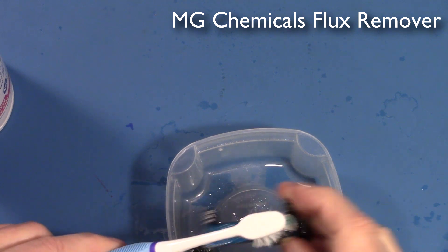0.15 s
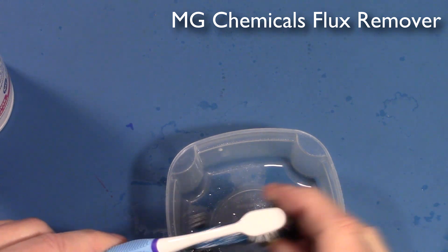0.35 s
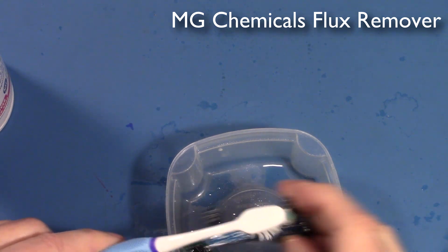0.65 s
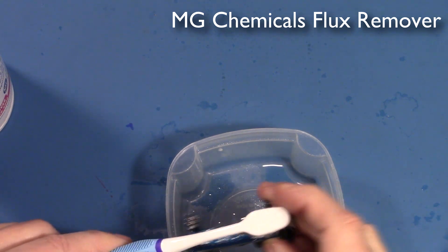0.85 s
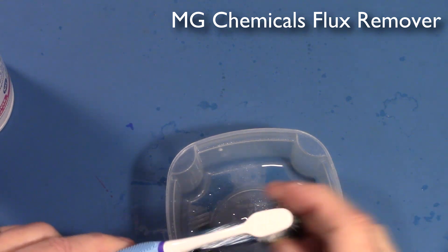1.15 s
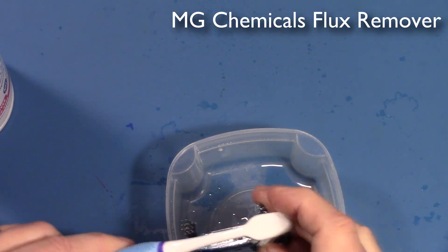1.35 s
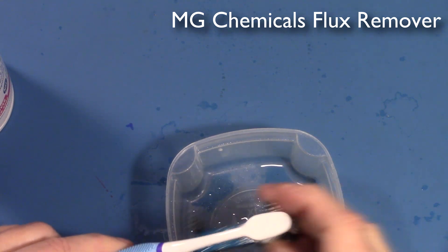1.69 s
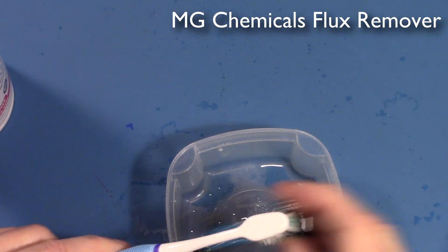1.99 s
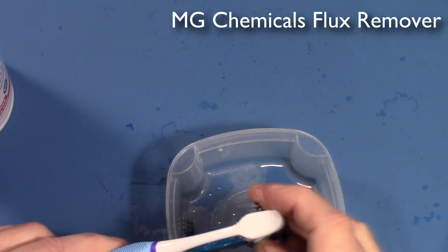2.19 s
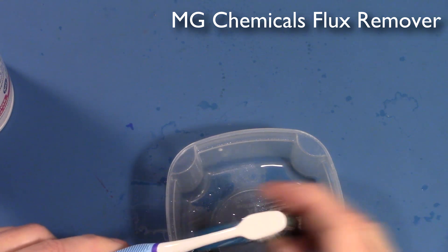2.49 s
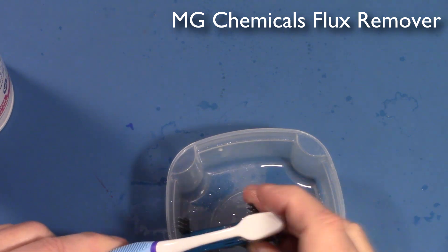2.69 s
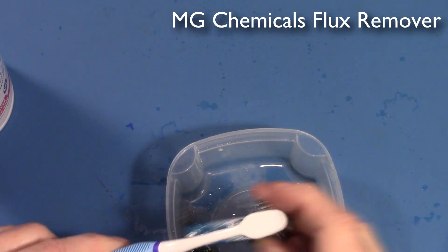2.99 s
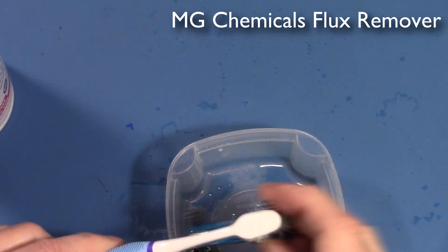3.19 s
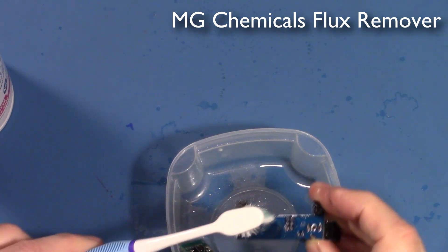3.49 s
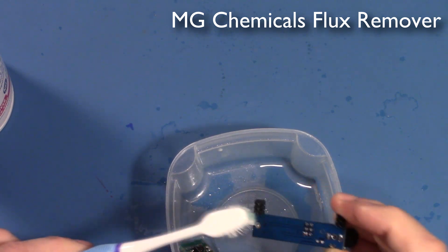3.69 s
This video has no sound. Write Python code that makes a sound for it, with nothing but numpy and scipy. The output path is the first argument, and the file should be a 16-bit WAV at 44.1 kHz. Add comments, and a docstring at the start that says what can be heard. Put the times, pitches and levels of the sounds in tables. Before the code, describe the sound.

A toothbrush scrubs a wet circuit board over a plastic tub, crisp strokes growing stronger before stopping near the end; close microphone, small dry room, strong low electrical hum and faint hiss.

```python
"""Over a plastic tub, in a space with a short echo, a toothbrush scrubs to and fro on a small wet board.
The board is an electronic one: bristles flick across its pins and parts and make it ring.
Flicks and scrubbing are shaped noise, single snaps and ticks are fading tones, and two knocks hit the tub.
Strong mains hum made of steady tones, soft low throbs and a little noise hiss lie under it all."""
import sys
import numpy as np
from scipy import signal
from scipy.io import wavfile
from scipy.ndimage import uniform_filter1d

SR = 44100
rng = np.random.default_rng(int(sys.argv[2]) if len(sys.argv) > 2 else 0)


def generate_wav(signal):
    """Clip the signal to [-1, 1] and save it as 16-bit WAV at the path in sys.argv[1]."""
    frames = np.transpose(np.atleast_2d(signal))
    scaled = np.clip(frames, -1, 1) * 32767
    pcm = np.round(scaled).astype(np.int16)
    wavfile.write(sys.argv[1], SR, pcm)


N = 169785  # length in samples

# Shape of the hiss. Each row: pitch in Hz, relative level in dB per Hz.
HISS_SHAPE = [(8, -8.5), (22, 1.5), (40, -15), (70, -13.5), (130, -18.5), (300, -21), (700, -28.5),
              (1500, -31.5), (3500, -32.5), (8000, -40.5), (12000, -45), (15800, -48)]
# Steady tones of the hum. Each row: multiple of the mains pitch, peak level in dB.
HUM_TONES = [(1, -39), (2, -72), (3, -53), (5, -66.5), (6, -92), (7, -71.5), (9, -73), (11, -85.5),
             (13, -80.5), (19, -93.5), (23, -81.5), (25, -79.5), (27, -84.5), (29, -85), (31, -85.5),
             (37, -97), (43, -84.5)]
# Low throbs. Each row: time in seconds, peak level in dB.
THROBS = [(.196, -47), (.911, -51), (1.614, -47), (2.337, -45), (3.059, -44), (3.782, -48)]
# Faint ticks of the lifted brush. Each row: start in seconds, level in dB before roughening.
TICKS = [(3.6611, -71), (3.6744, -71), (3.688, -64), (3.7279, -65.5), (3.7698, -70), (3.7973, -72)]
# Knocks on the tub. Each row: time in seconds, blow level in dB, blow pitch in Hz, ring pitch in Hz,
# ring level in dB against the blow, seconds for the ring to fall 60 dB, bounce delay in seconds,
# bounce level in dB against the first blow.
KNOCKS = [(1.8675, -44, 755, 650, -6, 0.025, 0.0065, -19),
          (1.94295, -28.5, 2010, 2350, -16.5, 0.02, .005, -14)]
# Snaps of single bristles. Each row: time in seconds, peak level in dB, pitch in Hz.
SNAPS = [(0.0398, -51, 9300), (0.0806, -57, 8600), (0.1219, -40, 9250), (0.1362, -39, 9600),
         (0.2548, -36.5, 9100.0), (0.2779, -45, 8800.0), (0.3161, -42.5, 8700.0), (0.3517, -41.0, 8900),
         (0.4495, -55, 10400.0), (0.472, -44, 9400.0), (0.59, -43.0, 8850), (0.6241, -37, 10000),
         (0.6956, -46, 9800), (0.765, -40.0, 9900.0), (0.7932, -38, 9350), (0.8259, -36.5, 9400),
         (0.8383, -48.0, 9400.0), (0.8487, -47.0, 9400.0), (0.8805, -39, 9800), (0.9057, -36, 9600),
         (0.939, -44, 9300.0), (0.9544, -42, 10200), (0.978, -49, 10000.0), (0.9966, -43, 9400),
         (1.0257, -44, 10100), (1.049, -40, 9500), (1.164, -47, 9600), (1.2133, -57, 10300),
         (1.2353, -40, 10000), (1.2407, -39, 8750), (1.2952, -40.0, 8900.0), (1.3118, -39.0, 8700.0),
         (1.3188, -39.0, 8900.0), (1.332, -43, 9400.0), (1.3754, -46, 9600), (1.4103, -32.5, 9600),
         (1.4316, -45, 9200.0), (1.504, -48, 9000.0), (1.5537, -37, 9200), (1.586, -31, 9100),
         (1.6359, -48.0, 9500.0), (1.6488, -39, 9500.0), (1.6914, -35.0, 10300), (1.7487, -33.5, 9300),
         (1.7916, -44, 9100), (1.8001, -41, 9400), (1.889, -36.5, 9800), (1.93, -37.5, 9000),
         (1.9658, -32.0, 10200), (2.0659, -37.5, 9100), (2.1035, -34, 8950), (2.1849, -39, 9400),
         (2.191, -36, 10200.0), (2.2251, -30, 9000), (2.232, -28, 9100), (2.2633, -34, 6900),
         (2.3253, -44, 11600.0), (2.3999, -27.5, 8970), (2.435, -37, 9400), (2.4757, -30.0, 9200),
         (2.5146, -41, 8800), (2.6531, -38, 9400), (2.6961, -44.0, 9300.0), (2.7029, -46, 9400.0),
         (2.7463, -49, 9200), (2.7636, -34, 9000), (2.849, -42.0, 9800), (2.967, -43.0, 8900.0),
         (3.0809, -38.5, 6900.0), (3.096, -28, 8900), (3.133, -32, 8950), (3.1389, -35, 8800.0),
         (3.1495, -33, 9000), (3.2219, -48, 10100.0), (3.2438, -37, 9000), (3.3325, -50, 9300),
         (3.3427, -39, 8900), (3.3946, -53, 9200.0), (3.4035, -56, 7800.0), (3.4093, -56.0, 9200.0),
         (3.4195, -48, 9400.0), (3.7387, -60.0, 9200.0), (3.7586, -58, 10300)]
# Brush strokes. Each row: start of full speed in seconds, seconds held, bristle level in dB,
# rise in seconds per 20 dB, fall in seconds per 20 dB, then levels in dB against the bristles for
# the high, middle and low board ringing, the deep bristle ring and the fine fizz.
STROKES = [(0.0, 0.0041, -57, 0.299, 0.045, -15.0, -27, -31, -7.5, -17.0),
           (0.082, 0.042, -57.5, 0.016, 0.039, -2.5, -15.5, -20, -6.5, -15),
           (0.238, 0.028, -52.5, 0.08, 0.027, -13.5, -22, -24, -9, -14),
           (0.345, 0.014, -50.5, 0.042, 0.043, -9.5, -15.5, -20, -9, -18),
           (0.482, 0.044, -55, 0.11, 0.024, -13, -19.0, -17, -8.5, -15),
           (0.604, 0.025, -51, 0.044, 0.032, -11, -16.0, -15, -8, -14),
           (0.736, 0.054, -53.4, 0.083, 0.012, -12.5, -21, -16, -6.5, -14),
           (0.891, 0.021, -49.5, 0.08, 0.018, -13.0, -15.0, -17, -6, -17),
           (1.049, 0.002, -55.5, 0.21, 0.023, -13.5, -22, -15, -6, -17.0),
           (1.149, 0.017, -45, 0.049, 0.02, -12, -19.5, -18.5, -7.5, -16),
           (1.317, 0.0045, -51.5, 0.2, 0.018, -13, -21, -19, -7.5, -15),
           (1.413, 0.026, -48.5, 0.067, 0.025, -10, -15, -18.5, -9, -15),
           (1.562, 0.034, -51, 0.1, 0.029, -13, -20, -21, -8.5, -16),
           (1.696, 0.013, -45.5, 0.06, 0.03, -12, -16.0, -20, -7.5, -14),
           (1.841, 0.031, -48.5, 0.12, 0.038, -15, -20, -20.5, -9, -14),
           (1.964, 0.032, -47, 0.06, 0.02, -11.5, -13.5, -22.5, -8.5, -14),
           (2.099, 0.038, -48.5, 0.1, 0.017, -14.5, -21.5, -19.5, -8.5, -16.0),
           (2.224, 0.042, -47, 0.067, 0.02, -12.5, -17.5, -21, -7.5, -13),
           (2.363, 0.029, -49.5, 0.11, 0.012, -14.5, -20, -20, -8.5, -15),
           (2.474, 0.026, -45.5, 0.06, 0.036, -12.5, -16.5, -19.5, -8, -15.0),
           (2.607, 0.04, -51, 0.089, 0.021, -12.0, -17.5, -18, -8, -16),
           (2.731, 0.021, -44.0, 0.047, 0.036, -11.5, -14.5, -16.5, -6.5, -13),
           (2.875, 0.032, -49, 0.088, 0.031, -13.5, -16.5, -19, -7.5, -13),
           (2.994, 0.023, -45.8, 0.049, 0.028, -13.5, -17, -20.5, -4.5, -16),
           (3.103, 0.069, -49.5, 0.064, 0.023, -13, -23.5, -25, -9.5, -16.0),
           (3.264, 0.065, -52, 0.057, 0.037, -12.5, -18, -20, -5.0, -12),
           (3.484, 0.002, -46.5, 0.072, 0.084, -13.5, -19.5, -16, -9, -15),
           (3.666, 0.013, -67.0, 0.046, 0.17, -12, -24, -17, -5.5, -19)]
# Tone colour of the bristle flicks. Each row: pitch in Hz, relative level in dB.
BRISTLE_COLOUR = [(3000, -59), (5300, -25), (6840, -33.5), (7500, -10.5), (8130, -5), (9260, -1.5),
                  (10500, -9), (12000, -11), (13500, -24), (15800, -55.5)]
# Ring of longer bristles. Each row: pitch in Hz, width in Hz, relative level in dB.
DEEP_BRISTLE_RING = [(6360, 820, 1.5), (6900, 310, 0.5), (7480, 200, -9)]
# Tone colour of the fine fizz. Each row: pitch in Hz, relative level in dB.
FIZZ_COLOUR = [(8000, -27), (11000, -3), (12500, 4.5), (14000, -3.5), (15800, -20)]
# Low ringing of the board. Each row: pitch in Hz, width in Hz, relative level in dB.
BOARD_LOW = [(704, 80, -5.5), (923, 83, 0), (1217, 150, -0.5), (1580, 200, -4)]
# Middle ringing of the board. Each row: pitch in Hz, width in Hz, relative level in dB.
BOARD_MID = [(2130, 620, -4.5), (2350, 380, 5.5), (3010, 330, 3)]
# High ringing of the board. Each row: pitch in Hz, width in Hz, relative level in dB.
BOARD_HIGH = [(3785, 1100, 2.5), (4440, 460, 3.5), (4980, 220, -5), (5520, 230, -7.5)]

HISS_DB, HISS_PATCH_DB = -62.5, 2  # overall level, strength of the random patches
MAINS_HZ, HUM_LEAD_RAD, HUM_DELAY_S = 60, -0.31, 0.00458
THROB_HZ, THROB_SPREAD_S = 51, 0.0064
TICK_HZ, TICK_T60_S, TICK_ROUGH = 4980, 0.071, 0.86  # T60: time to fall 60 dB
BLOW_CYCLES = 0.35  # spread of the bell-shaped blow, in cycles of its own pitch
SNAP_T60_S, SNAP_RISE_S, SNAP_EDGE_DB = 0.0019, 0.0004, -19
SNAP_ECHO_S, SNAP_ECHO_DB = 0.0012, -14.5  # off the tub wall
FLICKS_PER_S, FLICK_SPREAD_DB = 6000, 5  # average rate, unevenness in size
GROUPS, FLICK_PATCH_DB = 12, 3  # bristle groups and how much their colours differ
TUFT_S = 0.012  # another tuft of bristles leads after this long
CLUMP_DB, CLUMP_S, SWISH_DB = 1, 0.0037, -4
BOARD_RUB_DB = -1.2  # smooth rubbing beside the flicks
BOARD_LAG_S = 0.002  # the board answers late
HIGH_STEEP, MID_STEEP, LOW_STEEP = 1, 1.4, 1.9  # larger: sounds mostly at full speed
ROOM_DB, ROOM_T60_S = -14.5, 0.046
EDGE_HZ = 15900


def amp(db):
    """Turns decibels into a plain multiplier."""
    return 10 ** (np.asarray(db) / 20)


def evened(x):
    """Scales x to an average (RMS) strength of one."""
    return x / np.sqrt(np.mean(x ** 2) + 1e-30)


def read(points, hz):
    """Reads a level curve between its points, along a logarithmic pitch scale."""
    f, value = np.transpose(points)
    return np.interp(np.log(hz + 1), np.log(f + 1), value)


def add(mix, s, sound):
    """Adds a sound into the mix, starting at s seconds."""
    part = mix[round(s * SR):][:len(sound)]
    part += sound[:len(part)]


def colour(x, db):
    """Filters x to a dB curve on 257 bins, with no sound before its cause (minimum phase)."""
    log_gain = np.log(amp(np.r_[db, db[-2:0:-1]]))
    taps = np.fft.ifft(np.exp(np.conj(signal.hilbert(log_gain)))).real
    return signal.oaconvolve(x, taps[:256])[:N]


def ring(x, modes):
    """Sends x through fixed resonances; a wider one dies away faster."""
    out = np.zeros(N)
    for hz, width, db in modes:
        r = np.exp(-np.pi * width / SR)
        feedback = [1, -2 * r * np.cos(2 * np.pi * hz / SR), r * r]
        out += amp(db) * evened(signal.lfilter([1, 0, -1], feedback, x))
    return evened(out)


def ping(hz, t60):
    """A tone that falls 60 dB in t60 seconds."""
    t = np.arange(0, t60, 1 / SR)
    return amp(-60 * t / t60) * np.sin(2 * np.pi * hz * t)


def hiss():
    """Room and circuit hiss: random short-time spectra with faint drifting patches."""
    frames, hz = N // 1024 + 5, np.fft.rfftfreq(4096, 1 / SR)
    a, b, patches = rng.standard_normal((frames, 2049, 3)).T
    patches = uniform_filter1d(patches, 40, axis=0)  # smooth across pitch
    patches = evened(uniform_filter1d(patches, 3, axis=1))  # smooth across time
    spectra = (a + 1j * b) * amp(read(HISS_SHAPE, hz)[:, None] + HISS_PATCH_DB * patches)
    sound = signal.istft(spectra, nperseg=4096, noverlap=3072)[1][:N]
    return amp(HISS_DB) * evened(sound)


def hum():
    """Mains hum: the mains pitch with mostly odd multiples, as steady tones."""
    t = np.arange(N) / SR - HUM_DELAY_S
    return sum(amp(db) * np.cos(2 * np.pi * k * MAINS_HZ * t + HUM_LEAD_RAD) for k, db in HUM_TONES)


def throbs():
    """Soft low throbs: about one cycle of a deep tone under a bell-shaped swell."""
    t, out = np.arange(N) / SR, np.zeros(N)
    for s, db in THROBS:
        swell = np.exp(-0.5 * ((t - s - THROB_SPREAD_S / 2) / THROB_SPREAD_S) ** 2)
        out += amp(db) * swell * np.cos(2 * np.pi * THROB_HZ * (t - s))
    return out


def lifted_brush_ticks():
    """Thin fading tones, each roughened by random wobbles in level."""
    out, tick = np.zeros(N), ping(TICK_HZ, TICK_T60_S)
    for s, db in TICKS:
        wobble = evened(uniform_filter1d(rng.standard_normal(8000), 60))[:len(tick)]
        add(out, s, amp(db) * tick * (1 + TICK_ROUGH * wobble))
    return out


def tub_knocks():
    """A short blow sets the tub ringing, then a weaker bounce repeats it."""
    out, t = np.zeros(N), np.arange(-100, 2000) / SR  # the blow is centred on t = 0
    for s, db, hz, ring_hz, ring_db, t60, after, bounce_db in KNOCKS:
        blow = np.exp(-0.5 * (t * hz / BLOW_CYCLES) ** 2) * np.cos(2 * np.pi * hz * t)
        tail = (t > 0) * amp(ring_db - 60 * abs(t) / t60) * np.cos(2 * np.pi * ring_hz * t)
        knock = blow + tail
        add(out, s + t[0], amp(db) * knock)
        add(out, s + t[0] + after, amp(db + bounce_db) * knock)
    return out


def bristle_snaps():
    """A bristle springs free: a tiny fading tone, a sharp click and an echo off the tub wall."""
    out = np.zeros(N)
    for s, db, hz in SNAPS:
        snap = ping(hz, SNAP_T60_S)
        snap = snap * np.minimum(np.arange(len(snap)) / SR / SNAP_RISE_S, 1)
        snap = snap / abs(snap).max()
        add(out, s - SNAP_RISE_S, amp(db) * snap)
        add(out, s, amp(db + SNAP_EDGE_DB) * np.array([1., -2, 1]))
        add(out, s + SNAP_ECHO_S, amp(db + SNAP_ECHO_DB) * snap)
    return out


def stroke_level(lag_s, steep, column=None):
    """Rise, hold and fall of every stroke, added in power; column picks a relative level."""
    t, power = np.arange(0, N, 32) / SR - lag_s, 0
    for row in STROKES:
        s, hold, db, rise, fall = row[:5]
        relative_db = row[column] if column else 0
        down = np.maximum(s - t, 0) / rise + np.maximum(t - s - hold, 0) / fall
        power = power + amp(2 * (db + relative_db - 20 * steep * down))
    return np.interp(np.arange(N), np.arange(0, N, 32), np.sqrt(power))


def flicks_and_swish():
    """Clumps of random flicks of unequal size, over the smooth noise of a wet swish."""
    clumps = uniform_filter1d(rng.standard_normal(N), max(round(CLUMP_S * SR), 1))
    clumps = amp(CLUMP_DB * evened(clumps))
    size = amp(FLICK_SPREAD_DB * np.minimum(rng.exponential(1, N), 4))
    size = size * rng.choice([-1., 1.], N)
    flicks = evened(size * (rng.random(N) < FLICKS_PER_S / SR))
    return evened(clumps * (flicks + amp(SWISH_DB) * rng.standard_normal(N)))


def bristles(drive):
    """Bristle tips, each group with its own colour, with a deeper ring and a fine fizz."""
    hz = np.fft.rfftfreq(512, 1 / SR)
    tuft = rng.integers(0, GROUPS, N)[np.arange(N) // round(TUFT_S * SR)]
    group = (tuft + rng.integers(0, 5, N)) % GROUPS  # neighbouring groups join in
    own = uniform_filter1d(rng.standard_normal((GROUPS, 257)), 14, axis=1)
    own = FLICK_PATCH_DB * evened(own - own.mean(0))
    shape = read(BRISTLE_COLOUR, hz)
    tips = evened(sum(colour(drive * (group == k), shape + own[k]) for k in range(GROUPS)))
    deep = ring(drive, DEEP_BRISTLE_RING)
    fizz = evened(colour(drive, read(FIZZ_COLOUR, hz)))
    return (tips * stroke_level(0, 1)
            + deep * stroke_level(BOARD_LAG_S, 1, column=8)
            + fizz * stroke_level(0, 1, column=9))


def board(drive):
    """The board rings in three bands, shaken by the flicks and by smooth rubbing."""
    rub = drive + amp(BOARD_RUB_DB) * rng.standard_normal(N)
    return (ring(rub, BOARD_HIGH) * stroke_level(BOARD_LAG_S, HIGH_STEEP, column=5)
            + ring(rub, BOARD_MID) * stroke_level(BOARD_LAG_S, MID_STEEP, column=6)
            + ring(rub, BOARD_LOW) * stroke_level(BOARD_LAG_S, LOW_STEEP, column=7))


def scrub():
    """The same flicks and swish sound the bristles and shake the board."""
    drive = flicks_and_swish()
    return bristles(drive) + board(drive)


def room(x):
    """A short echo tail: sparse random reflections that fade away."""
    taps = np.zeros(SR // 4)
    at = np.arange(100, len(taps) - 20, 20)
    strength = rng.choice([-1., 1.], len(at)) * amp(-60 * at / SR / ROOM_T60_S)
    taps[at + rng.integers(0, 20, len(at))] = strength
    return signal.oaconvolve(x, taps / np.linalg.norm(taps))[:N]


def scene():
    """Brush and tub sounds with their room echo, over hiss, hum and throbs."""
    background = hiss() + hum() + throbs()
    near = lifted_brush_ticks() + tub_knocks() + bristle_snaps() + scrub()
    return (background + near + amp(ROOM_DB) * room(near))[None]


def record(dry):
    """Cuts the treble above EDGE_HZ with a steep filter."""
    taps = signal.firwin(511, EDGE_HZ, window=("kaiser", 9), fs=SR)
    return signal.oaconvolve(dry, taps[None], "same")


dry = scene()
out = record(dry)
generate_wav(out)
```